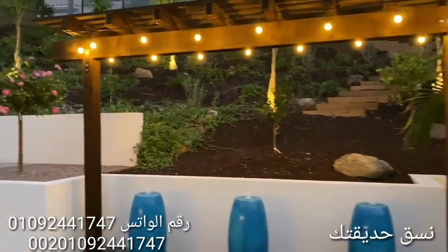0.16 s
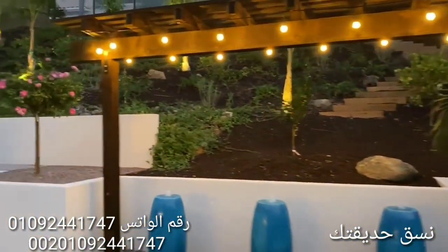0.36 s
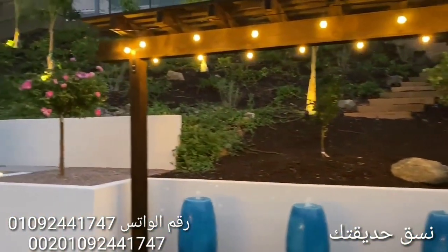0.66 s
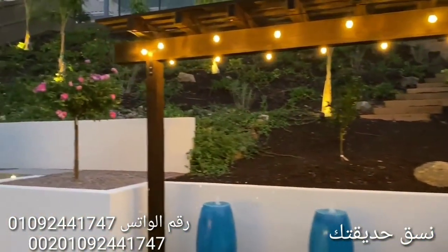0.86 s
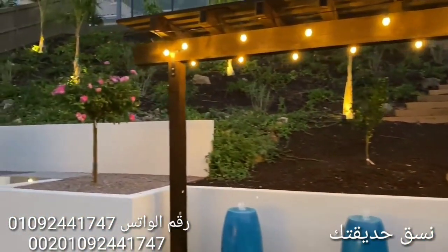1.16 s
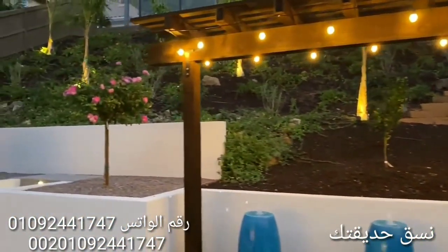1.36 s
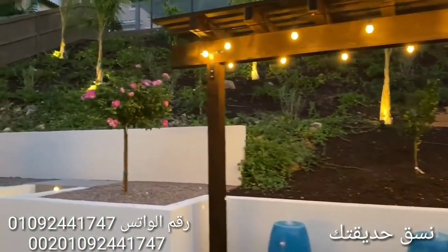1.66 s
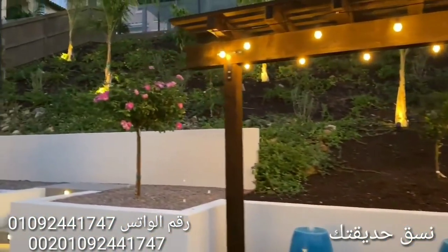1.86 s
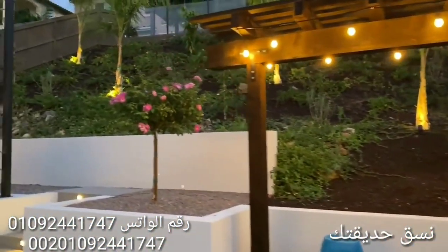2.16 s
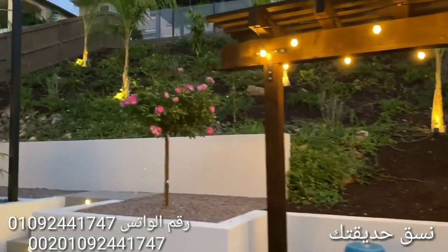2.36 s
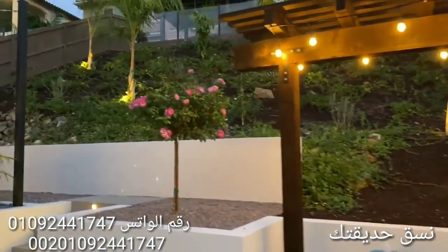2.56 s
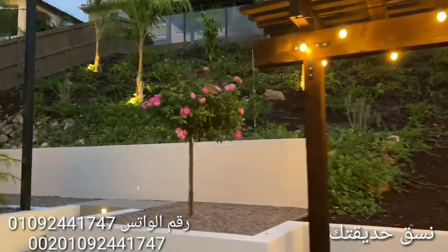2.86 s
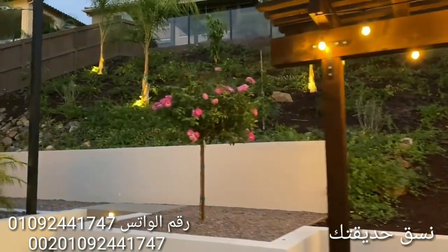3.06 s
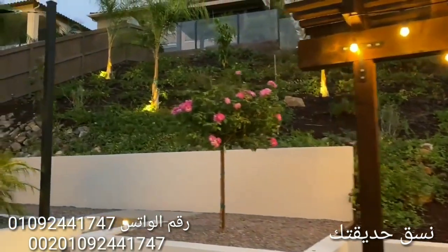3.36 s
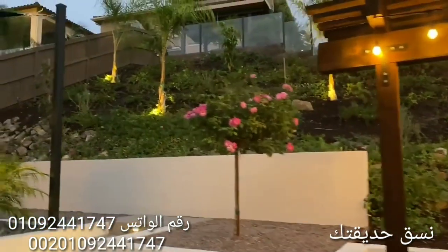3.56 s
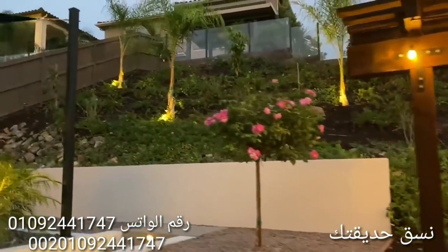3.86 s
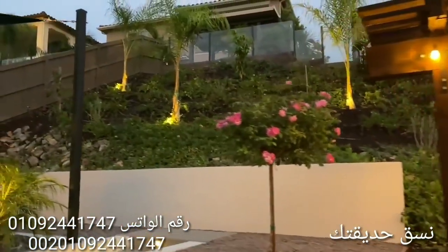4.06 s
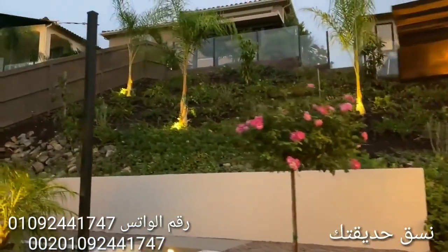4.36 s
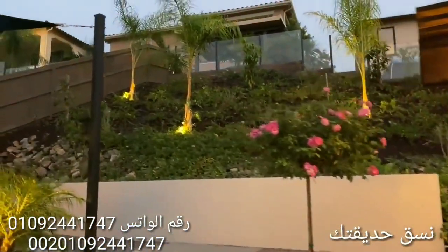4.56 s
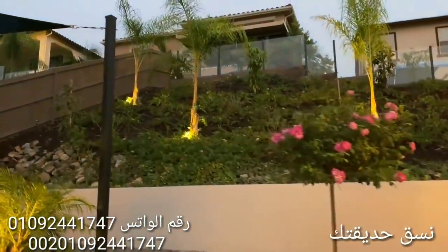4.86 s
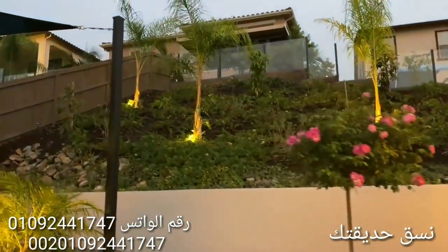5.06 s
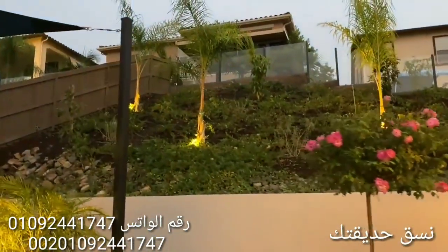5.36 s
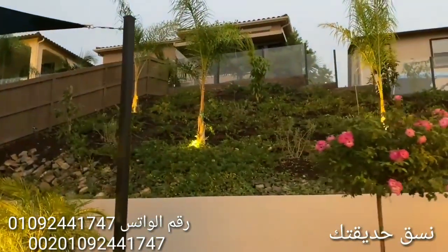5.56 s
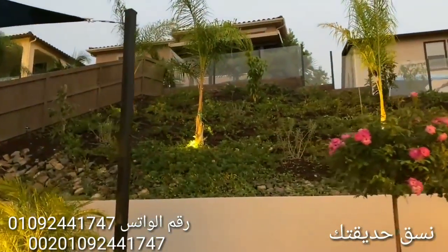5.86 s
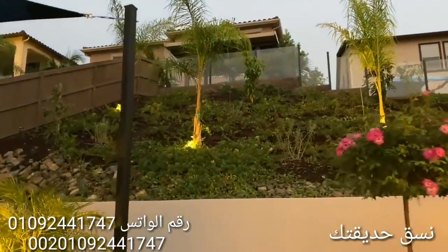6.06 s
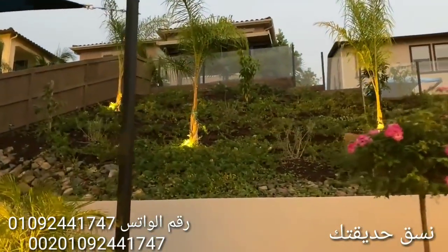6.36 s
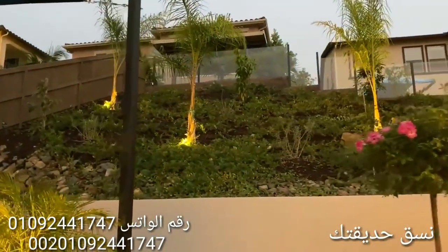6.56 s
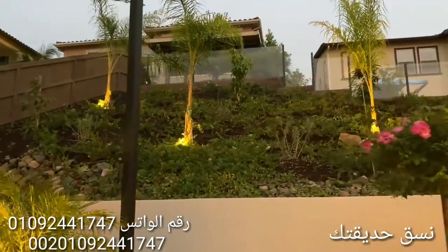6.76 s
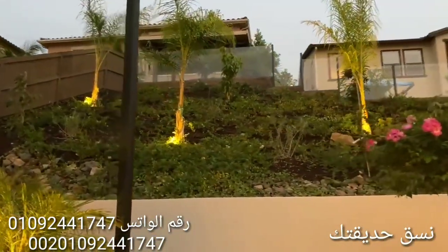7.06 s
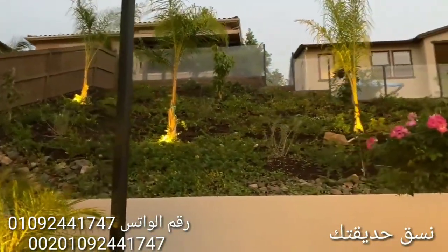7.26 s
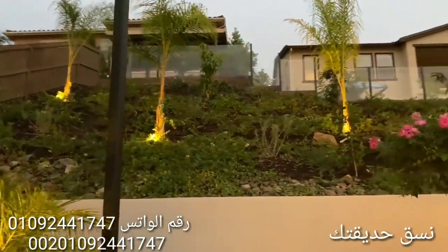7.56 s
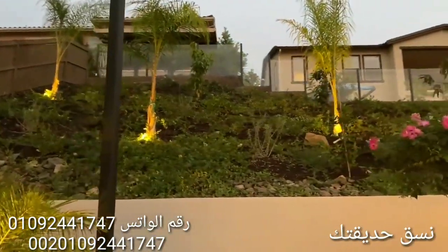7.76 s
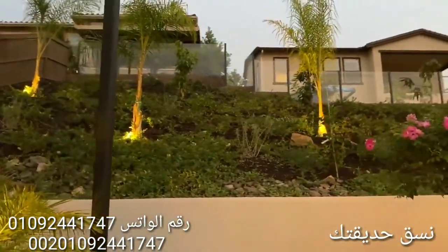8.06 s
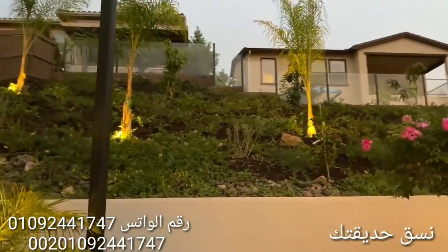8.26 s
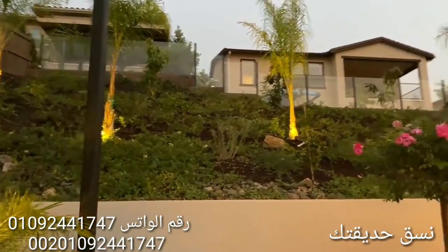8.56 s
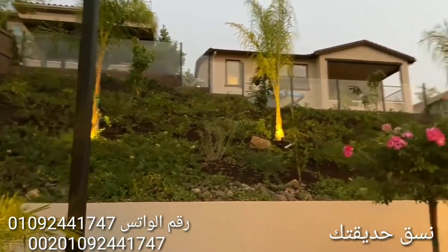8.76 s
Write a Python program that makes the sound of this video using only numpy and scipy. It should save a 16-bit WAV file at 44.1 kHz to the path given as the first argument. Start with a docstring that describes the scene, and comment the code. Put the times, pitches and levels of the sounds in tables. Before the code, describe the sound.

Sparrows chirp sharply and quickly up close over a dense steady flock chorus in a quiet evening garden, with faint hoarse crows far behind.

```python
"""Sparrows in an evening garden

Near birds whistle short gliding notes (pitch-arced sines), and other birds repeat their chirps, resampled.
A flock further off chirps without pause: overlaid, resampled copies of the near song with echoes.
Far roosters crow faintly (roughened tones) and dull knocks sound (damped sines). Breath noise follows
the birds; coloured noise makes the air, with a wavering sine as a machine's hum. One microphone.
"""
import sys
import numpy as np
from scipy import signal
from scipy.fft import rfft, irfft, next_fast_len
from scipy.io import wavfile
from scipy.ndimage import uniform_filter1d, map_coordinates

SR = 44100
rng = np.random.default_rng(int(sys.argv[2]) if len(sys.argv) > 2 else 0)


def transcribe(signal):
    """Save signal, clipped to [-1, 1], as a 16-bit WAV file at the path in sys.argv[1]."""
    frames = np.atleast_2d(signal).T
    limited = np.clip(frames, -1, 1)
    pcm = np.round(limited * 32767).astype(np.int16)
    wavfile.write(sys.argv[1], SR, pcm)


N = 392929

# Air and distant town, spectrum. Each row: frequency in Hz, relative density in dB per Hz.
AIR_SPECTRUM = [(25, 2), (50, 7), (100, -4.5), (200, -5), (400, -10.5), (1200, -9), (2000, -13),
                (4000, -3.5), (7000, -21), (13000, -25.5), (15500, -25)]
# Slow swell of the air. Each row: time in seconds, rms level in dB.
AIR_SWELL = [(0, -47.5), (1.2, -49.5), (5.75, -49), (6.02, -53.5), (6.2, -49.4), (8.91, -48.6)]
# Loudness of the whole flock. Each row: time in seconds, rms level in dB.
FLOCK_LEVEL = [(0.0, -40.5), (0.14, -41.5), (0.22, -40.5), (0.67, -43), (0.81, -34.5), (0.99, -46.5),
               (1.09, -37), (1.2, -43), (1.34, -35), (1.45, -41), (1.53, -39.5), (1.67, -46.5), (1.86, -38),
               (1.92, -35), (2.07, -49), (2.31, -38.5), (2.4, -42.5), (2.49, -34), (2.69, -47),
               (2.84, -43.5), (2.9, -46), (3.14, -34), (3.29, -42), (3.33, -41), (3.5, -44), (3.54, -38),
               (3.59, -36.5), (3.71, -43), (3.97, -43), (4.14, -33.5), (4.26, -40.5), (4.33, -39.5),
               (4.59, -52.5), (4.7, -33), (5.1, -45.5), (5.25, -37), (5.28, -39.5), (5.6, -43.5),
               (5.72, -43), (5.82, -42.5), (5.89, -40.5), (6.07, -49), (6.15, -40), (6.21, -43.5),
               (6.35, -34.5), (6.54, -49.5), (6.68, -37.5), (6.84, -43.5), (7.08, -48), (7.2, -41.5),
               (7.29, -33), (7.48, -43), (7.88, -45), (7.99, -51.5), (8.12, -34), (8.2, -44), (8.26, -36.5),
               (8.41, -47.5), (8.57, -35), (8.73, -44), (8.84, -38), (8.91, -44)]
# Far crows. Each row: start in seconds, length in seconds, start Hz, end Hz, level in dB, hoarseness 0-1.
CROWS = [(0, 0.3, 568, 562, -61, .3), (.55, 0.28, 1140, 1086, -62, 0.47),
         (2.101, .95, 1335, 1319, -60, 0.89), (2.851, 0.12, 590, 586, -57, 0.2),
         (3.4, 0.76, 1372, 1325, -62.5, 0.43), (5.403, 0.593, 740, 716, -63.5, 0.83),
         (6.5, 0.082, 1096, 1110, -60.5, .3), (6.898, 0.93, 1224, 1182, -62.5, 0.61),
         (7.654, 0.23, 1298, 1282, -59, 0.34), (8.19, 0.4, 1290, 1300, -61, 0.49),
         (8.352, 0.48, 1000, 983, -59, 0.86), (8.511, 0.21, 1276, 1296, -51, 0.11),
         (8.7, 0.17, 1250, 1200, -58.5, .4)]
# Repeated chirps. Each row: start in seconds, kind, pitch and tempo ratio, level in dB against the model chirp.
ANSWERS = [(.174, "hook", 1.01, -4.5), (.291, "hook", 0.95, -4), (.397, "long", 0.98, -8),
           (1.04, "high", 0.96, -11), (1.5, "hook", 0.93, -7), (2.285, "hook", 0.92, -5),
           (2.338, "arch", 0.96, -4.5), (3.236, "hook", 1.05, -7), (3.395, "arch", 0.94, -4.5),
           (4.052, "hook", 1.06, 1), (5.488, "low", 1.03, -4.5), (5.932, "arch", 1.0, -4),
           (6.575, "high", 0.9, -11), (7.088, "low", 1.06, -4), (7.81, "hook", 0.99, -13.5),
           (7.865, "hook", 1.0, -11), (8.065, "high", 1.05, -12), (8.233, "hook", 1.11, -2),
           (8.437, "hook", .97, -15), (8.525, "high", .97, -14.5)]
# Model chirps. Each entry: kind, its start in the near song in seconds.
CHIRP_START_S = {"high": 3.52, "low": 6.09, "hook": 3.33, "long": 3.06, "arch": 3.586}
# Near whistled notes. Each row: start in seconds, length in ms, start Hz, middle Hz, end Hz,
# level of the first half in dB, level of the second half in dB.
NOTES = [(0.221, 41, 4640, 3786, 3700, -31.5, -31.5), (0.251, 26.5, 3014, 2863, 2990, -38.5, -35.5),
         (0.735, 23.3, 3964, 5090, 4730, -33.5, -25), (0.752, 17.5, 4285, 4380, 3850, -35.5, -22),
         (0.771, 21.2, 3197, 3810, 3820, -32.5, -24.5), (0.81, 19.7, 4310, 3920, 3670, -23, -31.5),
         (0.842, 28, 3110, 3630, 4220, -32.5, -29), (1.279, 8.3, 4020, 4770, 5920, -48, -28),
         (1.288, 19, 5480, 6054, 5100, -26, -34.5), (1.303, 28, 5074, 4550, 3770, -22, -25.5),
         (1.336, 23.7, 2910, 3710, 3300, -31.5, -26.5), (1.535, 19.3, 4294, 3654, 3680, -29.5, -44),
         (1.561, 24, 3152, 3720, 2950, -25.5, -31.5), (1.868, 38, 2610, 2820, 2840, -46.5, -53),
         (1.896, 17.7, 3586, 5140, 5240, -30, -30), (1.907, 17.3, 5750, 5790, 5570, -23, -30),
         (1.913, 21.3, 4650, 4150, 4220, -31, -25), (1.922, 29, 4710, 4920, 3750, -26, -32),
         (1.934, 9.7, 4000, 4020, 3840, -30, -26), (1.94, 21, 4804, 3940, 3700, -25, -37),
         (1.956, 16, 3450, 4250, 4100, -27, -26), (1.959, 24, 3100, 3350, 4100, -38, -28.5),
         (1.979, 15.3, 3605, 3450, 3910, -46, -26), (1.995, 38.5, 3818, 3430, 3290, -30.5, -34),
         (2.475, 16.2, 4410, 5060, 4680, -28, -30), (2.484, 5.4, 5610, 5780, 6000, -20.5, -45),
         (2.489, 21.3, 4150, 4300, 3940, -26.5, -26.5), (2.508, 25, 3023, 3830, 3330, -37, -25),
         (3.066, 24.3, 3356, 4695, 4430, -37, -31), (3.083, 42.7, 4154, 3570, 3505, -25.5, -42),
         (3.133, 28.8, 2953, 2860, 2570, -41, -49), (3.161, 21.6, 4350, 3670, 3990, -28.5, -40),
         (3.184, 30, 2840, 3650, 4080, -37, -27.5), (3.303, 50, 3344, 2674, 2334, -39.5, -56),
         (3.337, 17.5, 4320, 4920, 4930, -31, -30.5), (3.354, 24.1, 4260, 3734, 3360, -26, -41.5),
         (3.529, 9.8, 4150, 4920, 5500, -50, -36), (3.539, 24, 5565, 6000, 5400, -27, -45),
         (3.553, 6.4, 5360, 4985, 4600, -17, -52.5), (3.561, 14.1, 5065, 4610, 3980, -17, -24),
         (3.588, 26.1, 3190, 3823, 3380, -28.5, -30.5), (4.117, 15.4, 4300, 4800, 5070, -33, -19),
         (4.131, 10.7, 5870, 5340, 5250, -18.5, -43), (4.137, 20, 4393, 4030, 3210, -22.5, -26.5),
         (4.153, 10, 4007, 4045, 3950, -23, -26.5), (4.187, 19.8, 4100, 4100.0, 3980, -34, -27),
         (4.655, 31, 4296, 5160, 6860, -40, -41), (4.682, 16, 3880, 4880, 5080, -31.5, -24),
         (4.694, 8.6, 5790, 5680, 5360, -22.5, -28), (4.7, 10, 4350, 4240, 4570, -29, -22),
         (4.712, 5.9, 4460, 4220, 4480, -23, -31), (4.714, 19, 5210, 4960, 5040, -36, -36),
         (4.718, 22.3, 3200, 3820, 3860, -28, -26.5), (4.841, 25, 2453, 3420, 3530, -42, -25.5),
         (5.267, 8, 3580, 4340, 4880, -40, -31), (5.275, 45, 4880, 5160, 4760, -25, -28),
         (5.278, 30, 5440, 5673, 5110, -24.5, -23.5), (5.312, 18, 4660, 4285, 3320, -25, -28),
         (5.365, 28.2, 3155, 3990, 4110, -25.5, -26.5), (5.656, 26.3, 4150, 4260, 3820, -32, -30.5),
         (5.697, 21.2, 3214, 3570, 4030, -29.5, -26), (5.872, 9.1, 3900, 5000, 5530, -44, -35),
         (5.882, 17.4, 5660, 5880, 5080, -28.5, -32.5), (5.882, 34, 4620, 4860, 3790, -30, -30),
         (5.918, 16, 3963, 4150, 4170, -25, -42), (6.098, 17.2, 3810, 4530, 4750, -33, -29.5),
         (6.114, 37.7, 4140, 3535, 3490, -30.5, -40), (6.153, 49, 3396, 2804, 2270, -40.5, -53.5),
         (6.32, 36.2, 4560, 5690, 5120, -30.5, -34), (6.342, 33, 4335, 3900, 4130, -27, -39.5),
         (6.366, 33, 3378, 3470, 4140, -29.5, -25.5), (7.111, 36.8, 4100, 3526, 3640, -29.5, -31.5),
         (7.151, 50, 3396, 2804, 2250, -38, -56.5), (7.259, 17.1, 4194, 4950, 5000, -31, -30.5),
         (7.33, 42, 3720, 3470, 3200, -29.5, -33), (7.334, 37, 4250, 4090, 3740, -32.5, -38),
         (7.402, 20, 2776, 2760, 3470, -46.5, -36), (8.13, 37.4, 2995, 3694, 3900, -31, -32),
         (8.272, 20.2, 3177, 3766, 3890, -35, -31.5), (8.566, 33.6, 5180, 5435, 5290, -28, -51),
         (8.589, 14.3, 4320, 4050, 4070, -34, -27.5), (8.794, 9.5, 3990, 4880, 5860, -37, -45),
         (8.802, 11.2, 5650, 5940, 5760, -29, -26.5), (8.812, 15.7, 5690, 4880, 4850, -23, -32),
         (8.827, 25.8, 4870, 4080, 3810, -25, -22), (8.863, 31.7, 3953, 3330, 3590, -28.5, -32)]
# Dull knocks. Each row: start in seconds, initial envelope of the first thud in dB, mode in Hz.
KNOCKS = [(3.124, -44.5, 332), (3.234, -45, 355), (3.357, -45.5, 476)]

HUM_HZ, HUM_DB = 59.5, -54.5  # centres of its wavering
TOP_HZ = 15500


def undb(db):
    """Amplitude ratio from dB."""
    return 10 ** (np.asarray(db) / 20)


def unit(x):
    """Scales to rms 1."""
    return x / np.sqrt(np.mean(x ** 2))


def curve(rows):
    """Straight lines through (seconds, value) rows, one value per sample."""
    s, value = np.transpose(rows)
    return np.interp(np.arange(N) / SR, s, value)


def walk(rate_hz):
    """Random levels held 1 / rate_hz seconds, smoothed twice; rms 1."""
    hold = max(int(SR / rate_hz), 16)
    steps = np.repeat(rng.standard_normal(N // hold + 1), hold)
    smooth = uniform_filter1d(uniform_filter1d(steps, hold), hold)
    return unit(smooth[:N])


def add(track, start_s, sound):
    """Mixes a sound into the track from start_s on."""
    i = max(int(start_s * SR), 0)
    track[i:i + len(sound)] += sound[:max(len(track) - i, 0)]


def whistle(hz, db, start_rad, overtone):
    """Syrinx tone: a sine of the given rms level plus a second harmonic of the given share."""
    phase = start_rad + 2 * np.pi * np.cumsum(hz) / SR
    return np.sqrt(2) * undb(db) * (np.sin(phase) + overtone * np.sin(2 * phase))


def echoes(x, t60_s, onset_s):
    """Walls and hedges scatter the sound into a fading tail of noise."""
    t = np.arange(SR // 2) / SR
    decay = np.exp(-np.log(1000) * t / t60_s)
    tail = rng.standard_normal(len(t)) * decay * (1 - np.exp(-t / onset_s))
    return signal.fftconvolve(x, tail / np.sqrt(np.sum(tail ** 2)))[:N]


def even(x, size, share):
    """Takes a share of the loud-soft contrast, averaged over size samples, out of a sound."""
    power = uniform_filter1d(unit(x) ** 2, size)
    return unit(x / (power + 0.0033) ** (share / 2))


def air():
    """Coloured noise whose octave bands flicker independently."""
    size = next_fast_len(N)
    hz = np.maximum(np.fft.rfftfreq(size, 1 / SR), 1)
    table_hz, table_db = np.transpose(AIR_SPECTRUM)
    colour = undb(np.interp(np.log(hz), np.log(table_hz), table_db))
    spectrum = rfft(rng.standard_normal(size)) * colour * (hz > 15)
    out = np.zeros(N)
    for centre_hz in 2 ** np.arange(4, 15):
        band = np.cos(np.pi / 2 * np.clip(np.log2(hz / centre_hz), -1, 1)) ** 2
        flicker_db = 1.66 * walk(7.8)
        out += irfft(spectrum * band, size)[:N] * undb(flicker_db)
    return unit(out) * undb(curve(AIR_SWELL))


def hum():
    """A machine's sine, wavering in pitch and level."""
    hz = HUM_HZ + 0.912 * walk(6)
    db = HUM_DB + 2 * walk(5.2)
    return whistle(hz, db, 0, 0)


def flock(song, count=24):
    """Far birds loop the near song, each from its own moment, at its own pitch, tempo and level."""
    out = np.zeros(N)
    song = even(song, size=900, share=0.57)
    for when, high, far in rng.uniform(0, 1, (count, 3)):
        ratio = .96 + .19 * high
        place = (when * N + ratio * np.arange(N)) % N
        out += undb(-6 * far) * np.interp(place, np.arange(N), song)
    out = unit(out) + undb(-3.5) * unit(echoes(out, t60_s=0.35, onset_s=0.0086))
    return even(out, size=3000, share=1.0) * undb(curve(FLOCK_LEVEL))


def roosters():
    """One harmonic of each far crow carries, with a weak octave; hoarseness roughens pitch and level."""
    out, rasp, rattle = np.zeros(N), walk(350), walk(60)
    for start_s, length_s, start_hz, end_hz, db, hoarse in CROWS:
        first = int(start_s * SR)
        n = min(int(length_s * SR), N - first)
        at = slice(first, first + n)
        hz = np.linspace(start_hz, end_hz, n) * (1 + .09 * hoarse * rasp[at])
        tone = whistle(hz, db + 4 * hoarse * rattle[at], 0, overtone=0.081)
        add(out, start_s, signal.windows.tukey(n, .5) * tone)
    return out + undb(-4) * echoes(out, t60_s=0.2, onset_s=0.01)


def breath(birds):
    """Air rushing past the beaks: a bright, patchy hiss that follows the loudness of the calls."""
    effort = uniform_filter1d(birds ** 2, size=900) ** 0.36
    bandpass = signal.butter(2, [6000, 10500], "bandpass", fs=SR, output="sos")
    hiss = signal.sosfilt(bandpass, rng.standard_normal(N))
    patches_db = 3.5 * walk(30)
    return undb(-40) * effort * unit(hiss) * undb(patches_db)


def answers(song):
    """Model chirps resampled: a ratio above 1 is higher and quicker, below 1 lower and slower."""
    out, span = np.zeros(N), np.arange(SR // 11)
    for start_s, kind, ratio, db in ANSWERS:
        place = CHIRP_START_S[kind] * SR + ratio * span
        chirp = map_coordinates(song, [place], order=1)
        add(out, start_s, undb(db) * signal.windows.tukey(len(span), .1) * chirp)
    return out


def notes():
    """Each note is an arc of pitch; the syrinx flutters in level and pitch and its overtone is husky."""
    out, flutter, waver, husk = np.zeros(N), walk(500), walk(300), walk(1500)
    overhang_ms = 3.0  # beyond either end; each fade lasts twice this
    starts_rad = rng.uniform(0, 2 * np.pi, len(NOTES))
    for (start_s, length_ms, *hz, db_a, db_b), start_rad in zip(NOTES, starts_rad):
        ms = np.arange(-overhang_ms, length_ms + overhang_ms, 1000 / SR)
        at = np.clip((start_s * SR + ms * SR / 1000).astype(int), 0, N - 1)
        arc_hz = np.polyval(np.polyfit([0, .5, 1], hz, 2), ms / length_ms)
        db = np.interp(ms, np.array([.25, .75]) * length_ms, [db_a, db_b]) + 1.93 * flutter[at]
        edge = np.clip(np.minimum(ms - ms[0], ms[-1] - ms) / (2 * overhang_ms), 0, 1)
        # pressed harder while the pitch shoots up, the syrinx gives more overtone; full at 150 Hz per ms
        climb = np.clip(np.gradient(arc_hz, ms) / 150, 0, 1)
        overtone = undb(-34) * husk[at] + undb(-21) * climb
        tone = whistle(arc_hz * (1 + 0.0205 * waver[at]), db, start_rad, overtone)
        add(out, start_s - overhang_ms / 1000, np.sin(np.pi / 2 * edge) ** 2 * tone)
    return out


def knocks():
    """Short wooden thuds, each a quickly damped mode with a slightly stronger rebound."""
    out, t = np.zeros(N), np.arange(2000) / SR
    for start_s, db, hz in KNOCKS:
        thud = undb(db) * np.exp(-t / 0.0043) * np.sin(2 * np.pi * hz * t)
        add(out, start_s, thud)
        add(out, start_s + .009, undb(2) * thud)
    return out


def scene():
    """Sums all sources into two identical channels."""
    song = notes()
    near = song + answers(song)
    birds = near + undb(-7) * echoes(near, t60_s=.15, onset_s=0.0019) + flock(song)
    mono = birds + breath(birds) + roosters() + knocks() + air() + hum()
    return np.array([mono, mono])


def record(dry):
    """A single microphone whose top is cut by a steep low-pass."""
    lowpass = signal.ellip(12, .2, 60, TOP_HZ, fs=SR, output="sos")
    return signal.sosfilt(lowpass, dry)


dry = scene()
out = record(dry)
transcribe(out)
```